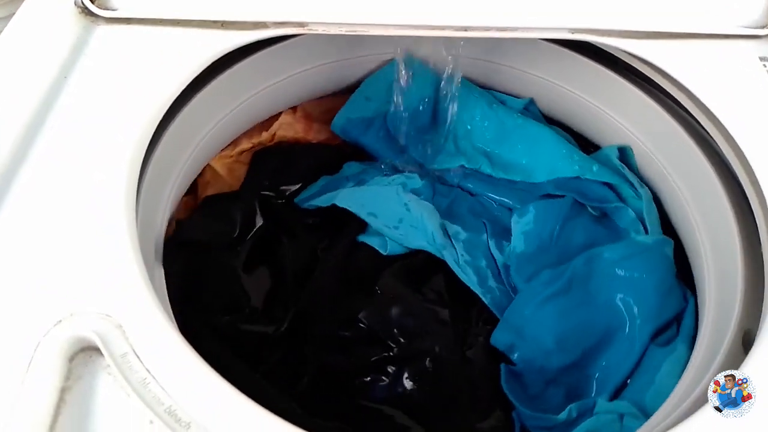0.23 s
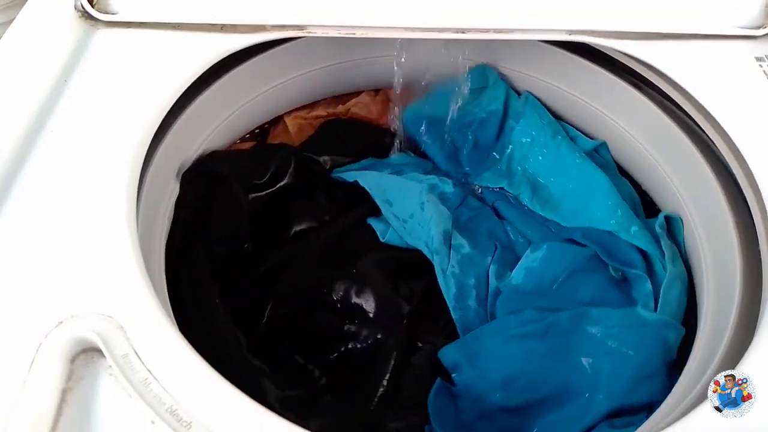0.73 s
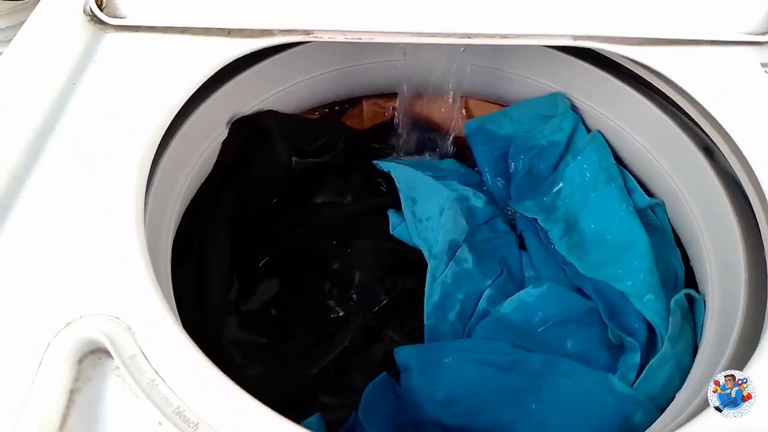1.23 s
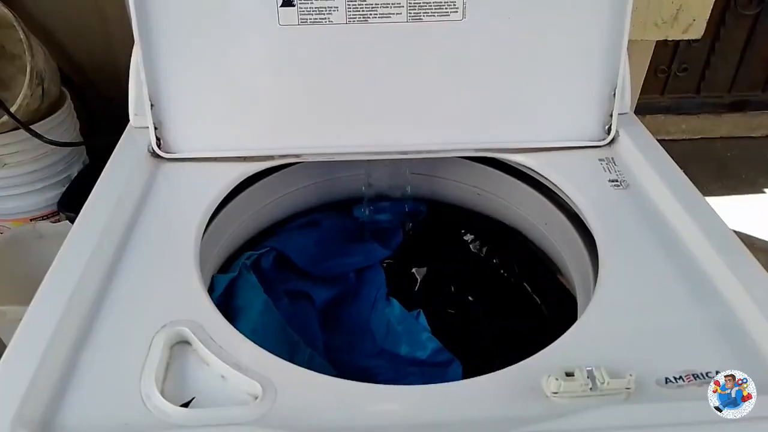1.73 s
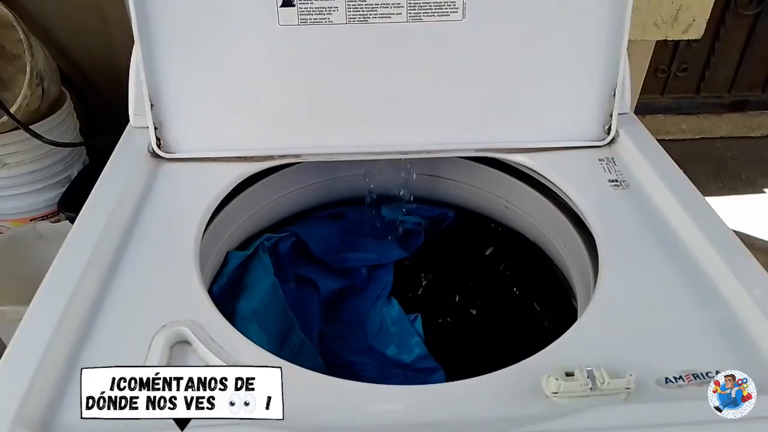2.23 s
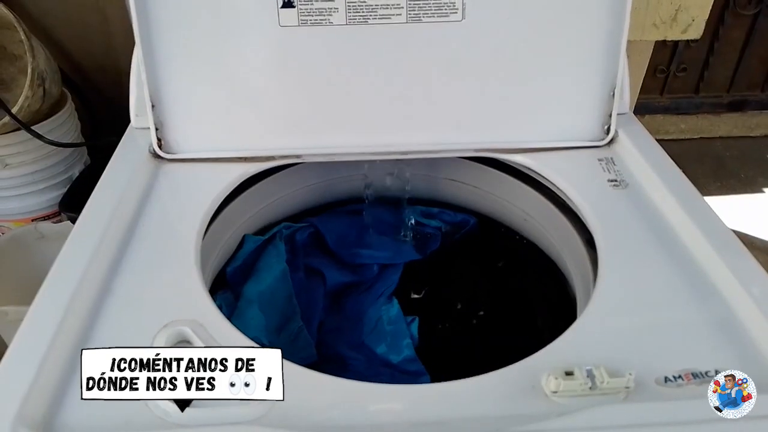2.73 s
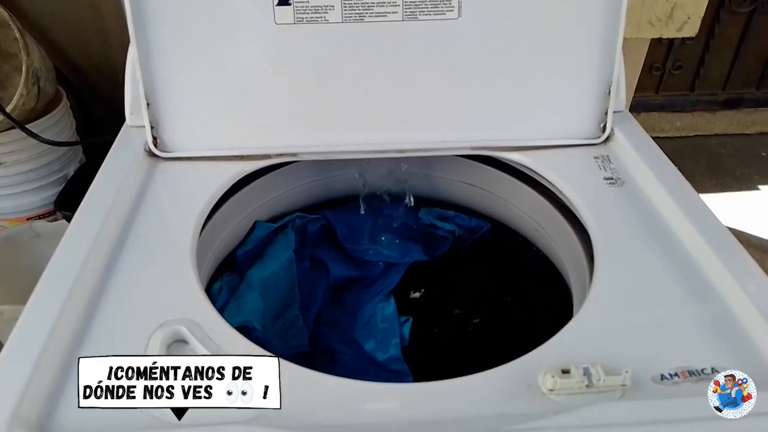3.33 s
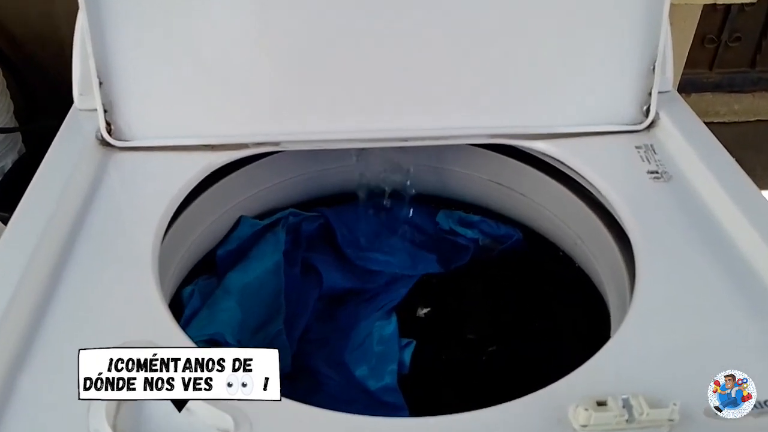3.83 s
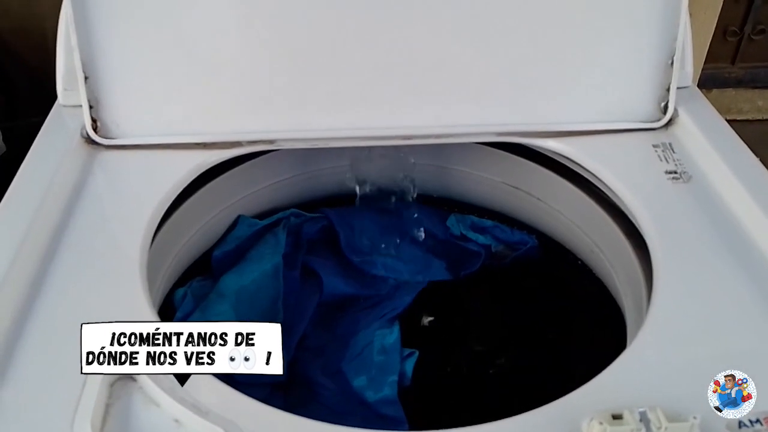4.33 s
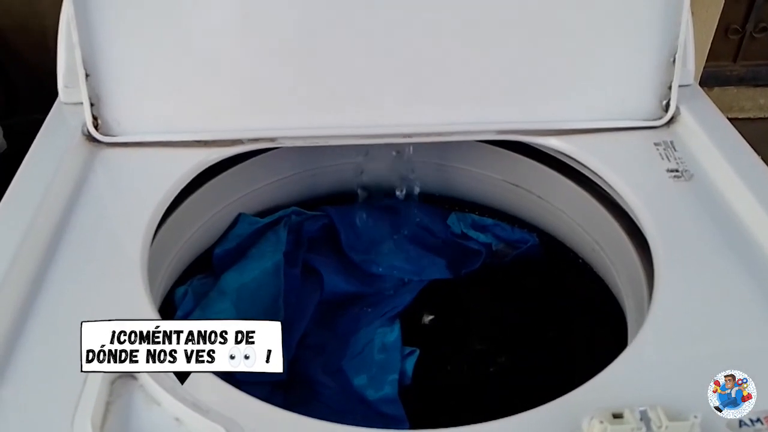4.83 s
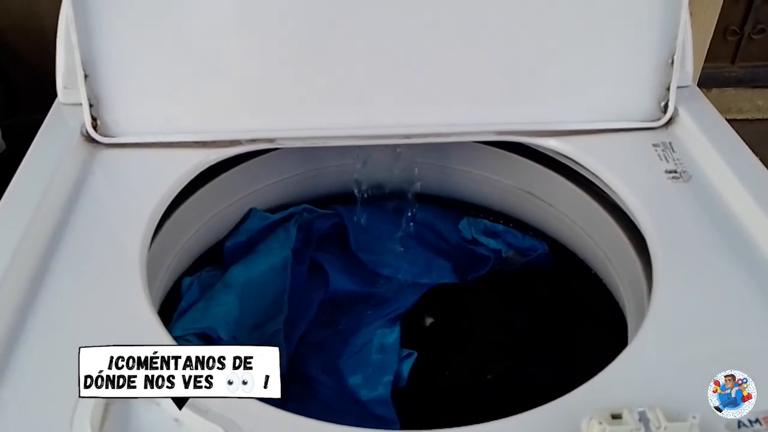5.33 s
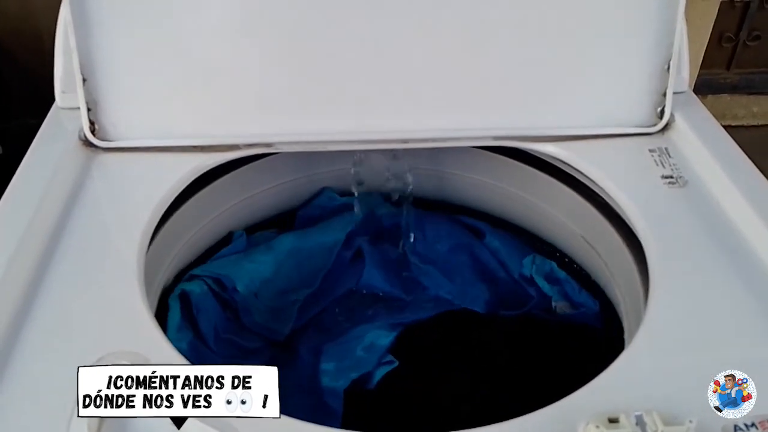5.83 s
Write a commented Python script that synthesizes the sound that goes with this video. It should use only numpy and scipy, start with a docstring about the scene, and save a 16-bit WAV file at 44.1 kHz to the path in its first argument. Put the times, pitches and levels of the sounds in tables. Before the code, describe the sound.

Water trickles and spatters onto cloth in a washing machine tub, close at first, then after a brief gap from further back.

```python
"""Water falls into a washing machine's tub onto dry clothes: random drops, each a short rising chirp with a
noise splash, pass through resonant hollows in the cloth. Single large drops and ringing air pockets stand out.
Sparse echoes and decaying noise form the tub's reverberation; standing waves colour the close first part.
After a near-silent tenth of a second the pour is heard from further back. A sine hum with a throb that grows
near the end, dull noise scuffs, a double thump and filtered background noise lie behind the water."""
import sys
import numpy as np
from scipy import signal
from scipy.fft import rfft, irfft, next_fast_len
from scipy.io import wavfile
from scipy.ndimage import uniform_filter1d, minimum_filter1d

SR = 44100
rng = np.random.default_rng(int(sys.argv[2]) if len(sys.argv) > 2 else 0)


def generate_wav(sig):
    """Save sig (samples, or channels by samples) to the path in sys.argv[1] as 16-bit PCM at SR."""
    pcm = np.round(np.clip(np.atleast_2d(sig).T, -1, 1) * 32767).astype(np.int16)
    wavfile.write(sys.argv[1], SR, pcm)


N = 267995

# typical pitch [Hz] and relative gain [dB] of each drop size; pats are relative to the fat drops
FAT_HZ, SMALL_HZ, SPRAY_HZ, PAT_HZ = 2795, 4970, 10060, 560
FAT_DB, SMALL_DB, SPRAY_DB, PAT_DB = -8.5, -6.5, -5.5, -21
# unevenness of a fully broken stream: depth [dB] and pace [Hz]
LUMPS_DB, LUMPS_HZ = 5, 54
# Relative level of each drop size, close by:
# (time [s], fat drops [dB], small drops [dB], spray [dB])
POUR_CLOSE = [(0.0, -33, -30.5, -28), (0.25, -36, -33.5, -30.5), (0.4, -35, -34.5, -28),
              (0.5, -30, -32.5, -26), (0.68, -39, -33, -29), (0.9, -39, -41.5, -28),
              (1.15, -53, -32.5, -24.5), (1.3, -54.5, -51, -37.5)]
# The same from further back, after the gap:
# (time [s], fat drops [dB], small drops [dB], spray [dB])
POUR_FURTHER_BACK = [(1.52, -56, -42.5, -35), (1.65, -50.5, -49.5, -37.5), (2.1, -44, -47.5, -37),
                     (2.3, -40, -45, -32), (2.48, -29.5, -41, -29), (2.68, -33.5, -34, -34),
                     (2.82, -40, -23.5, -33.5), (2.949, -46.5, -39, -36.5), (3.35, -45, -37.5, -34.5),
                     (3.62, -30, -42, -31.5), (3.85, -38.5, -30.5, -40.5), (4.1, -50, -34.5, -34.5),
                     (4.498, -35, -37, -36.5), (4.78, -52, -51.5, -42.5), (5.15, -42, -46, -36),
                     (5.7, -43.5, -43, -38.5), (6.08, -60, -62, -39.5)]
# Spectral colour of the spray: (frequency [Hz], gain [dB])
SPRAY_SPECTRUM = [(3000, 5), (5500, 1), (7000, -0.5), (9000, -2.5), (11000, -2), (13000, -4.5), (16000, -4)]
# The spray's pitch moves, turning higher and finer as the stream climbs a tight fold:
# (time [s], pitch shift [octaves])
SPRAY_PITCH_SHIFT = [(1.6, -0.1), (2.0, -0.18), (2.22, -0.097), (2.4, 0.16), (2.6, .35), (2.84, .4),
                     (2.98, -0.1)]


def pour():
    """Superposition of random impacts: an uneven stream of fat drops with pats on cloth, small drops and spray."""
    fat_db, small_db, spray_db = in_time(np.vstack([POUR_CLOSE, POUR_FURTHER_BACK]))
    fat = spatter(FAT_HZ, count=3600, pitch_spread=0.31, size_spread_db=4.5,
                  cycles=5.564, splash_db=-9.5, glide=0.18)
    small = spatter(SMALL_HZ, count=4600, pitch_spread=0.42, size_spread_db=8.5,
                    cycles=4.0, splash_db=-22.0, glide=0.089)
    spray = spatter(SPRAY_HZ, count=9000, pitch_spread=0.26, size_spread_db=14.5,
                    cycles=7.3, splash_db=-1.5, glide=0.023, shift=SPRAY_PITCH_SHIFT)
    pats = spatter(PAT_HZ, count=1500, pitch_spread=0.65, size_spread_db=6.5,
                   cycles=1.42, splash_db=-40.5, glide=0.11)
    spray = coloured(spray, SPRAY_SPECTRUM)
    fat, small, spray, pats = evened(in_folds(np.array([fat, small, spray, pats])))
    water = from_db(fat_db + FAT_DB) * (fat + from_db(PAT_DB) * pats)
    water += from_db(small_db + SMALL_DB) * small
    water += from_db(spray_db + SPRAY_DB) * spray
    lumps_db = LUMPS_DB * broken(seconds()) * flutter(LUMPS_HZ)
    return water * from_db(lumps_db)


def spatter(hz, count, pitch_spread, size_spread_db, cycles, splash_db, glide, shift=None):
    """Random arrivals: drops of unequal size and pitch land at independent moments, pitched around hz."""
    s = rng.random(count) * N / SR
    size, detune, damping = rng.standard_normal((count, 3)).T
    octaves = 0 if shift is None else np.interp(s, *np.transpose(shift))
    pitch = hz * 2 ** (octaves + pitch_spread * np.clip(detune, -2.5, 2.5))
    # an unbroken sheet evens out the drop sizes
    peak = from_db(size_spread_db * broken(s) * (np.minimum(size, 2.05) + 2))
    length = cycles / pitch * from_db(2.5 * damping)
    splash = np.full(count, from_db(splash_db))
    splash_hz = hz / 2 ** 0.74, hz * 2 ** 0.74
    return chirps(s, peak, pitch, length, splash, glide, splash_hz)


def chirps(s, peak, hz, length, splash, glide, splash_hz=(2450, 11570), count=300):
    """Bubble oscillation: a closing air pocket rises in pitch, with a splash of noise of the same envelope."""
    rise_time = np.maximum(length, 1 / SR)[:, None]
    age = np.arange(count) / SR / rise_time     # 1 at the loudest moment
    shape = peak[:, None] * (age * np.exp(1 - age)) ** 3
    pitch = np.minimum(hz[:, None] * (1 + glide * np.tanh(age - 1)), SR / 2)
    phase = 2 * np.pi * (np.cumsum(pitch, axis=1) / SR + rng.random((len(s), 1)))
    first = ((s[:, None] - rise_time) * SR).astype(int)
    at = np.clip(first + np.arange(count), 0, N).ravel()
    tones = np.bincount(at, (shape * np.sin(phase)).ravel(), N + 1)[:N]
    # the splashes are incoherent, so their powers add
    splash_power = np.bincount(at, ((shape * splash[:, None]) ** 2).ravel(), N + 1)[:N] / 2
    return tones + np.sqrt(splash_power) * rms_one(band(rng.standard_normal(N), *splash_hz))


# How far the stream lands as one unbroken sheet: (time [s], share [0-1])
SHEET_SHARE = [(0, 0.65), (1.2, 0.32), (1.5, 0.26), (2.3, 0.19), (2.42, 0.3), (2.75, 0.34), (2.95, 0.01),
               (3.6, 0), (6.08, 0.3)]


def broken(s):
    """Stream break-up: the share, 0 to 1, that has parted into separate lumps at these times."""
    return 1 - np.clip(np.interp(s, *np.transpose(SHEET_SHARE)), 0, 1)


# each resonance wanders as the cloth shifts under the water: depth [octaves] and pace [Hz]
WANDER_OCTAVES, WANDER_HZ = 0.016, 3.5
# Hollows in the laundry that ring while the stream plays on them and slide as they fill or drain:
# (start [s], end [s], pitch rise [octaves/s],
#  modes [(frequency at mid-time [Hz], width [Hz], boost or cut [dB]), ..])
CLOTH_HOLLOWS = [(-0.1, 0.49, 0.34, [(2075, 140, 14.5), (2900, 670, 8), (5520, 88, 9), (7060, 180, 0),
                 (7620, 150, 10.5), (12500, 760, 4.5)]), (0.514, 0.893, 0.28, [(1425, 79, 21),
                 (2010, 140, 9.5), (3350, 600, 11), (6700, 270, 3), (7760, 400, 8)]),
                 (0.827, 1.28, 0.025, [(3560, 250, 4), (7200, 1600, -28.5), (9380, 850, 10),
                 (12000, 900, 5)]), (1.6, 1.95, 0.5, [(9800, 870, 5)]), (1.91, 2.35, 0.15, [(1750, 130, 18),
                 (4370, 290, 5), (8300, 370, 10.5), (12300, 1100, 12.5), (14300, 460, 14)]),
                 (2.36, 2.774, 0.023, [(1740, 100, 30.5), (2170, 110, 25), (2800, 130, 21), (3080, 150, 21),
                 (3800, 110, 17), (4080, 200, 26.5), (4500, 110, 9), (5200, 88, 20), (5460, 93, 12.5),
                 (6470, 160, 6)]), (2.332, 2.522, -0.011, [(8760, 350, 24), (9200, 150, 6),
                 (11140, 770, 22), (12600, 300, 15)]), (2.48, 2.7, 0.35, [(10700, 250, 12),
                 (13000, 220, 13), (13200, 270, 13)]), (2.733, 2.914, 0.3, [(13900, 410, 18),
                 (15100, 390, 19)]), (2.756, 3.303, 0.18, [(3950, 460, 9), (6340, 210, 12.5),
                 (6950, 200, 7)]), (3.4, 4.125, -0.045, [(3080, 89, 12.5), (4370, 590, 11.5),
                 (5490, 120, 10.5), (7010, 150, 13), (12800, 420, 9)]),
                 (4.14, 4.53, -0.23, [(6560, 460, 3)])]


def in_folds(x, fade=0.12):
    """Cavity resonance: slowly sliding modes of each hollow colour the water while the stream plays on it."""
    out = x.copy()
    for start, end, rise, modes in CLOTH_HOLLOWS:
        first = max(int((start - fade) * SR), 0)
        last = min(int((end + fade) * SR), N)
        t = np.arange(first, last) / SR
        struck = x[..., first:last] * np.clip(.5 + np.minimum(t - start, end - t) / fade, 0, 1)
        for hz, width_hz, boost_db in modes:
            wander = WANDER_OCTAVES * flutter(WANDER_HZ, size=2 * SR)[:len(t)]
            clock = np.cumsum(2 ** (rise * (t - (start + end) / 2) + wander)) / SR
            # a one-pole memory that turns along with the resonance
            turn = np.exp(2j * np.pi * hz * clock)
            keep = np.exp(-np.pi * width_hz / SR)
            ringing = signal.lfilter([1 - keep], [1, -keep], struck * turn.conj() + 1e-18) * turn
            out[..., first:last] += 2 * (from_db(boost_db) - 1) * ringing.real
    return out


def evened(x):
    """Short-term power normalisation: the running level becomes 1 while single drops keep their contrast."""
    power = uniform_filter1d(uniform_filter1d(x ** 2, size=4000), size=4000)
    return x / np.sqrt(np.maximum(power, 0) + 1e-6)


# gain of the large drops direct and through the hollows [dB]
DROP_DB, DROP_FOLD_DB = -11, -16.5
# upward sweep of a fat drop as a share of its pitch, its fall-off power with pitch,
# and the splash [dB] below which the air pocket stays partly shut and sweeps less
DROP_SWEEP, SWEEP_FALLOFF, OPEN_SPLASH_DB = 0.37, 1.76, -18
# droplets thrown off: mean delay [s], relative level [dB], largest detuning [octaves]
DROPLET_DELAY_S, DROPLET_DB, DROPLET_OCTAVES = 0.0052, -17.5, 0.46
# Drops that stand out:
# (time of peak [s], relative peak [dB], pitch at peak [Hz], splash relative to chirp [dB])
LARGE_DROPS = [(0.016, -11, 7900, 2), (0.027, -11.5, 9140, -9), (0.048, -12.5, 2930, -30),
               (0.0725, -12.5, 3030, -32), (0.131, -17, 5600, -12), (0.1579, -10.5, 3050, -31),
               (0.209, -17, 3140, -29), (0.254, -11, 11800, -18), (0.268, -10.5, 9000, -2),
               (0.322, -10.5, 2410, -21), (0.331, -10, 8500, -4), (0.4764, -12, 4367, 4),
               (0.5002, -10, 4600, -10), (0.5198, -4, 8400, -13), (0.551, -20, 3070, -13),
               (0.559, -5, 9600, -26), (0.621, -13.5, 4000, -7), (0.653, -9.5, 7400, -17),
               (0.6658, -13.5, 3560, -3), (0.676, -5, 6670, -9), (0.6922, -24, 1930, -6),
               (0.6942, -2, 6960, -9), (0.7992, -4.5, 7630, -13), (0.801, -19.5, 3180, -16),
               (0.8593, -13.5, 9890, -20), (0.901, -23, 3400, -14), (0.924, -15, 9300, -10),
               (0.965, -5.5, 10340, -11), (0.9966, -7, 11000, -2.5), (1.018, -8, 9400, -24),
               (1.061, -8, 10400, -15), (1.11, -7.5, 8600, -10), (1.136, -14, 3150, -21),
               (1.1556, -15.5, 9500, -4), (1.2055, -11.5, 10300, -20), (1.232, -13.5, 9900, -14),
               (1.3713, -10, 7950, -4.5), (1.4987, -20, 8540, 4), (1.566, -19, 8600, 0),
               (1.934, -17, 8800, -22), (1.96, -18, 7600, -27), (2.0132, -29, 11500, 7.5),
               (2.0648, -16.5, 7900, -25), (2.1976, -8.5, 8400, -6), (2.2913, -9, 4260, -20),
               (2.3189, -11.5, 8600, -9), (2.322, -16.5, 4500, -20), (2.3595, -10, 10370, -3),
               (2.411, -16, 10500, -6), (2.4122, -22, 3000, -7), (2.441, -23, 2980, -4),
               (2.483, -23.5, 4320, -3), (2.536, -29.5, 5320, 6.5), (2.6, -28, 4270, -5),
               (2.635, -24.5, 2900, -4), (2.648, -24.5, 4340, 5), (2.685, -19.5, 5550, -22),
               (2.7472, -12, 2900, -18), (2.781, -12, 5260, -5.5), (2.798, -20.5, 12300, 6),
               (2.82, -13.5, 2900, -1.5), (2.831, -17.5, 2900, -4), (2.8386, -13, 4070, -3),
               (2.917, -18.5, 4100, -16), (2.929, -19.5, 4850, 1), (2.941, -16, 9200, -10),
               (3.005, -21, 4530, 1), (3.0537, -17.5, 6300, -4), (3.093, -17, 9000, -24),
               (3.142, -20, 5130, -2), (3.1748, -15, 6500, 4), (3.249, -18, 7000, 7),
               (3.256, -19.5, 3370, -11), (3.408, -22, 8900, -12), (3.446, -14.5, 3900, -15),
               (3.471, -10, 3890, -3.5), (3.4886, -5.5, 8600, -11), (3.508, -10.5, 4130, -21),
               (3.521, -9, 7320, -28), (3.576, 1.5, 4210, -37), (3.599, -1.5, 2710, -4.5),
               (3.6015, -1, 3900, -24), (3.6173, -7.5, 7040, -2.5), (3.682, -8, 7260, -27),
               (3.697, -4.5, 7180, -7), (3.701, -12.5, 3800, 2.5), (3.7494, -0.5, 3680, -14),
               (3.7869, -1.5, 3900, -5.5), (3.808, -10.5, 7300, -6), (3.841, -9, 5100, -25),
               (3.868, -9.5, 3720, -8), (3.898, -21, 7700, 1), (3.932, -12, 4100, -8),
               (3.97, 0.5, 3250, -15), (3.9968, -8, 9200, -0.5), (4.0616, -7.5, 6200, -6),
               (4.1688, -13, 6600, -11), (4.178, -18, 7900, -14), (4.2106, -14.5, 6600, -2),
               (4.217, -18.5, 2910, -7), (4.26, -25, 8650, -26), (4.3087, -1.5, 5400, -7),
               (4.383, -5, 10600, -9), (4.388, -9, 8960, -19), (4.4098, -11, 5600, -16),
               (4.425, -8, 5200, -6.5), (4.459, -8, 5400, -17), (4.5636, -13, 9640, 0),
               (4.593, -22, 5600, -17), (4.663, -7.5, 8800, -4), (4.759, -20.5, 4260, -4),
               (4.862, -16.5, 4000, 0.5), (4.913, -19, 8160, -5), (5.0715, -12.5, 9240, -11),
               (5.11, -18.5, 9300, 7), (5.1451, -10.5, 10040, -8), (5.34, -13, 9000, -18),
               (5.4017, -11.5, 5920, -31), (5.436, -21, 9150, -11), (5.583, -16, 9400, -14),
               (5.628, -15, 8760, -5), (5.87, -18.5, 8700, -5), (6.003, -10.5, 6300, -20)]


def loud_drops():
    """Bubble oscillation and secondary impacts: large drops chirp, throw off three droplets and stir hollows."""
    s, peak_db, hz, splash_db = np.transpose(LARGE_DROPS)
    splash = from_db(splash_db)
    opening = np.minimum(from_db(splash_db - OPEN_SPLASH_DB), 1)
    sweep = DROP_SWEEP * np.minimum(FAT_HZ / hz, 1) ** SWEEP_FALLOFF * opening
    x = chirps(s, from_db(peak_db), hz, drop_length(hz), splash, glide=sweep[:, None])
    for delay, detune in rng.random(size=(len(s), 3, 2)).transpose(1, 2, 0):
        landing = s + 2 * DROPLET_DELAY_S * delay
        pitch = hz * 2 ** (DROPLET_OCTAVES * (2 * detune - 1))
        x += chirps(landing, from_db(peak_db + DROPLET_DB), pitch, drop_length(pitch), splash, glide=0.081)
    return from_db(DROP_DB) * x + from_db(DROP_FOLD_DB) * in_folds(x)


# cycles to the peak at the fat drops' pitch; higher drops take more cycles by this power
DROP_CYCLES, CYCLES_GROWTH = 4.2, 0.39


def drop_length(hz):
    """Scaling of rise time with pitch: seconds that a large drop takes to swell to its peak."""
    return DROP_CYCLES * (hz / FAT_HZ) ** CYCLES_GROWTH / hz


# decay time [s] and pitch rise as a share of the starting pitch [1/s]
BUBBLE_T60_S, BUBBLE_RISE_PER_S = 0.029, 0.77
# Air pockets that plop in the wet cloth: (time [s], relative peak [dB], starting pitch [Hz])
AIR_POCKETS = [(0.01, -23.5, 1690), (0.393, -19, 2780), (0.452, -23, 2280), (0.474, -16.5, 2700),
               (0.69, -21.5, 1945), (0.782, -35, 1330), (0.873, -22, 3370), (2.107, -36, 1590),
               (2.197, -26, 1840), (2.243, -26, 1920), (2.408, -23, 2920), (2.462, -22.5, 1980),
               (2.537, -25, 1755), (2.554, -20, 3010), (2.598, -24, 2100), (2.847, -24, 1820),
               (2.386, -25, 2060), (4.554, -41, 2030), (5.1, -35, 1950), (5.335, -29, 1910),
               (5.833, -34, 2000), (6.037, -31.5, 2005)]


def bubbles():
    """Damped bubble resonance: each air pocket rings with exponential decay and rises slightly in pitch."""
    out = np.zeros(N + SR)
    age = np.arange(SR // 10) / SR
    shape = from_db(-60 * age / BUBBLE_T60_S) * np.minimum(age / 0.00204, 1)   # 2 ms onset
    for s, peak_db, hz in AIR_POCKETS:
        first = int(s * SR)
        cycles = hz * age * (1 + BUBBLE_RISE_PER_S * age / 2)
        out[first:first + len(age)] += from_db(peak_db) * shape * np.sin(2 * np.pi * cycles)
    return out[:N]


# decay times [s] and levels [dB] of the tub and of the lid and walls; one echo: delay [s], level [dB]
TUB_T60_S, TUB_DB, WALL_T60_S, WALL_DB = 0.025, -8, 0.16, -12
ECHO_S, ECHO_DB = .0028, -16.5


def tub(x):
    """Reverberation: a far-wall echo, dense fast-dying drum reflections, a fainter tail from lid and walls."""
    t = np.arange(SR // 3) / SR
    response = 1. * (t == 0)
    response[int(ECHO_S * SR)] = from_db(ECHO_DB)
    for t60, level_db, delay in [(TUB_T60_S, TUB_DB, .002), (WALL_T60_S, WALL_DB, .008)]:
        echoes = rng.standard_normal(len(t)) * from_db(-60 * t / t60) * (t > delay)
        response = response + from_db(level_db) * echoes / np.linalg.norm(echoes)
    return signal.fftconvolve(x, response)[:N]


# the near-silent gap [s]
GAP_START_S, GAP_END_S = 1.381, 1.4965
# Standing waves close over the drum's mouth: (frequency [Hz], width [Hz], boost or cut [dB])
DRUM_MODES = [(325, 40, 2.5), (433, 30, 6.5), (626, 120, 3.5), (1020, 140, 2.5), (1690, 58, 3.5),
              (1966, 80, 7.5), (2470, 440, -9), (2900, 270, 3), (3950, 110, 5.5), (4350, 230, -13.5),
              (4610, 110, 7.5), (5350, 170, 5.5), (6300, 770, -4), (8040, 170, 2.5), (8400, 260, -8),
              (8700, 150, 4.5), (9200, 140, 4.5), (9200, 180, -0.5), (10140, 300, 8), (11000, 400, -9),
              (11500, 180, 5.5), (12000, 160, 6.5), (13140, 187, 10.5), (13350, 400, -9), (13850, 140, 7.5),
              (14550, 560, -6), (15200, 400, 6)]


def drum(x):
    """Standing waves: up to the end of the gap, the drum's modes lift some pitches and hollow out others."""
    cut = int(GAP_END_S * SR)
    return np.concatenate([resonant(x[:cut], DRUM_MODES), x[cut:]])


HUM_WAVER_DB, HUM_WAVER_HZ = 2, 5.5
# pulse rate [Hz], time of one pulse's peak [s], pitch bend [Hz], pulse sharpness
THROB_HZ, THROB_PEAK_S, THROB_BEND_HZ, THROB_SHARPNESS = 14.4, 5.818, 11, 1.3
# Motor levels: (time [s], low hum [dB], its octave [dB], throb [dB])
MOTOR_LEVELS = [(0, -71.5, -64, -75), (0.5, -67, -63, -73), (0.68, -63.5, -57.5, -70),
                (0.9, -69.5, -65, -68), (1.5, -72.5, -62, -82), (5.15, -72, -64, -67),
                (5.3, -62.5, -50, -56), (5.72, -64.5, -54, -51), (5.83, -63, -49, -42),
                (6.08, -61, -46, -37.5)]
# Throbbing lines, each with its own lag: (frequency [Hz], level relative to throb [dB], lag [s])
THROB_LINES = [(344, -8.5, 0.023), (496, -3, 0.0043), (604, -11, 0.015)]


def motor():
    """Amplitude and frequency modulation: wavering mains hum; lines that throb and bend as the motor takes load."""
    t = seconds()
    low_db, octave_db, throb_db = in_time(MOTOR_LEVELS)
    out = np.zeros(N)
    for hz, db in [(120, low_db), (240, octave_db)]:
        level = from_db(db + HUM_WAVER_DB * flutter(HUM_WAVER_HZ))
        out += level * np.sin(2 * np.pi * (hz * t + rng.random()))
    for hz, db, lag in THROB_LINES:
        beat = 2 * np.pi * THROB_HZ * (t - THROB_PEAK_S - lag)
        pulse = np.abs(np.cos(beat / 2)) ** (2 * THROB_SHARPNESS)
        phase = 2 * np.pi * np.cumsum(hz - THROB_BEND_HZ * np.sin(beat)) / SR
        out += from_db(throb_db + db) * pulse * np.sin(phase)
    return np.sqrt(2) * out   # a steady sine's level is then its rms


SCUFF_RISE_S, SCUFF_HOLD_S, SCUFF_T60_S = 0.051, 0.0077, 0.39
THUMP_RISE_S, THUMP_HOLD_S, THUMP_T60_S = 0.012, 0.012, 0.16
# Dull scuffs: (time [s], level [dB], centre [Hz], half width [octaves])
DULL_SCUFFS = [(2.79, -37, 1510, 1), (3.521, -37.5, 1305, 0.47), (4.613, -30.5, 1280, 0.56),
               (4.87, -47.5, 1540, 0.88), (5.41, -53.5, 1310, 0.26)]
# The two strokes of the double thump: (time [s], relative level [dB])
THUMP_STROKES = [(5.223, -0.5), (5.25, 0.5)]
# Bands each stroke rings with: (level [dB], centre [Hz], half width [octaves])
THUMP_BANDS = [(-32, 434, 0.64), (-36.5, 610, 0.13), (-37.5, 992, 0.14), (-36, 1450, 0.3)]


def scuffs():
    """Band-limited noise bursts: a few soft scuffs and a hollow double thump, further off."""
    out = np.zeros(N)
    for s, level_db, hz, octaves in DULL_SCUFFS:
        out += swell(s, SCUFF_RISE_S, SCUFF_HOLD_S, SCUFF_T60_S, level_db, hz, octaves)
    for s, db in THUMP_STROKES:
        for level_db, hz, octaves in THUMP_BANDS:
            out += swell(s, THUMP_RISE_S, THUMP_HOLD_S, THUMP_T60_S, db + level_db, hz, octaves)
    return out


# the surroundings carry far sounds on: relative level [dB], decay time [s]
FAR_TAIL_DB, FAR_TAIL_T60_S = -11, 0.72


def swell(s, rise, hold, t60, level_db, hz, octaves):
    """Two-stage decay: a rounded swell of dull noise falls away, then lingers in the surroundings."""
    age = seconds() - s
    fall = np.maximum(age - rise - hold, 0)
    dying = np.hypot(from_db(-60 * fall / t60), from_db(FAR_TAIL_DB - 60 * fall / FAR_TAIL_T60_S))
    shape = np.sin(np.pi / 2 * np.clip(age / rise, 0, 1)) ** 2 * dying
    noise = rms_one(band(rng.standard_normal(N), hz / 2 ** octaves, hz * 2 ** octaves, order=3))
    return from_db(level_db) * shape * noise


BACKGROUND_DB = -48   # rms before the cabinet's resonances
# Background noise spectrum: (frequency [Hz], relative density [dB per Hz])
BACKGROUND_SPECTRUM = [(25, -17.5), (70, -17.5), (120, -6), (165, -21), (215, -1), (310, -1), (430, -3.5),
                       (620, -6), (780, -7), (1500, -9), (3000, -15.5), (9000, -10), (16000, -17)]
# Cabinet resonances: (frequency [Hz], width [Hz], boost [dB])
CABINET_MODES = [(208, 12, 5), (268, 11, 8), (322.2, 15, 9), (377, 11, 4.5), (438, 22, 6), (568, 28, 7.5),
                 (692, 22, 4.5)]


def background():
    """Filtered noise with panel resonance: the cabinet rings in a steady background."""
    noise = rms_one(coloured(rng.standard_normal(N), BACKGROUND_SPECTRUM))
    return resonant(from_db(BACKGROUND_DB) * noise, CABINET_MODES)


def resonant(x, modes):
    """Modal filtering: lift or hollow out the pitches of a table of (frequency [Hz], width [Hz], gain [dB])."""
    for hz, width_hz, boost_db in modes:
        x = x + (from_db(boost_db) - 1) * signal.lfilter(*signal.iirpeak(hz, hz / width_hz, fs=SR), x)
    return x


def flutter(rate_hz, size=N):
    """Low-pass random modulation: smooth noise of spread about 1, limited to 2, varying up to about rate_hz."""
    low_pass = signal.butter(2, rate_hz, fs=SR, output="sos")
    slow = signal.sosfilt(low_pass, rng.standard_normal(size + SR // 4))
    return np.clip(rms_one(slow[-size:]), -2, 2)


def coloured(x, points):
    """Spectral shaping: filter by a curve of (frequency [Hz], gain [dB]) on a log-frequency axis."""
    hz, db = np.transpose(points)
    size = next_fast_len(N)
    bins = np.maximum(np.fft.rfftfreq(size, 1 / SR), 1)
    gain = from_db(np.interp(np.log(bins), np.log(hz), db))
    return irfft(rfft(x, size) * gain, size)[:N]


def band(x, low_hz, high_hz, order=2):
    """Band limitation: a Butterworth band-pass."""
    edges = [low_hz, min(high_hz, SR / 2.1)]
    return signal.sosfilt(signal.butter(order, edges, "band", fs=SR, output="sos"), x)


def from_db(db):
    """Logarithmic level: decibels to amplitude gain."""
    return 10 ** (np.asarray(db) / 20)


def rms_one(x):
    """Effective value: scale to rms 1."""
    return x / np.sqrt(np.mean(x ** 2) + 1e-20)


def seconds():
    """Uniform sampling: the time of every sample."""
    return np.arange(N) / SR


def in_time(rows):
    """Linear interpolation: each column of a curve table, sample by sample."""
    s, *columns = np.transpose(rows)
    return [np.interp(seconds(), s, c) for c in columns]


def scene():
    """Superposition: water in the tub and the background share the drum's colour; scuffs and motor are added."""
    water = tub(pour() + loud_drops() + bubbles())
    return (drum(water + background()) + scuffs() + motor())[None]


CUTOFF_HZ = 15950


def record(dry):
    """Gain control and band limiting: a near-silent gap, a fast limiter at full scale, then a steep low-pass."""
    t = seconds()
    live = 1 - uniform_filter1d(1. * ((t > GAP_START_S) & (t < GAP_END_S)), size=40)
    limit = uniform_filter1d(minimum_filter1d(1 / np.maximum(np.abs(dry), 1), size=81), size=61)
    x = dry * limit * np.maximum(live, from_db(-48.5))
    return signal.sosfilt(signal.ellip(12, .1, 80, CUTOFF_HZ, fs=SR, output="sos"), x)


dry = scene()
out = record(dry)
generate_wav(out)
```